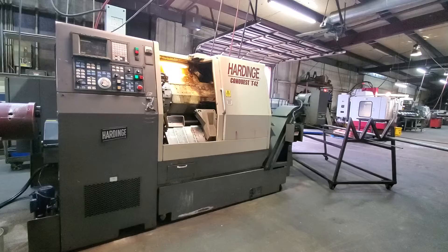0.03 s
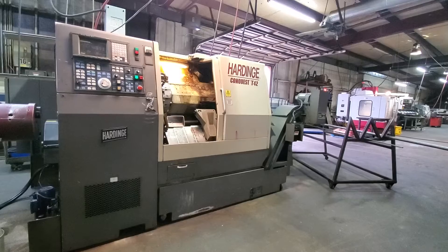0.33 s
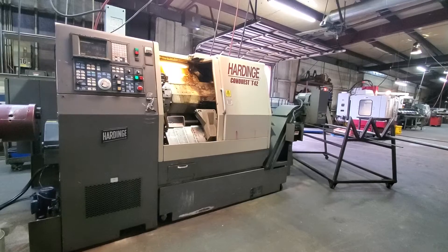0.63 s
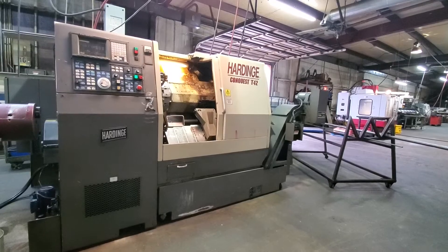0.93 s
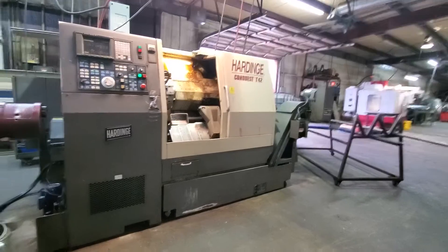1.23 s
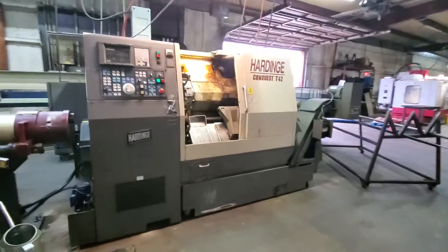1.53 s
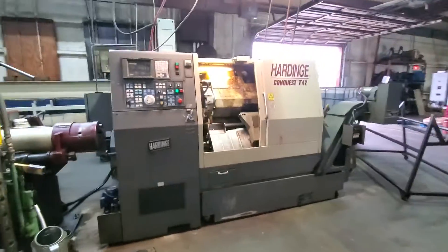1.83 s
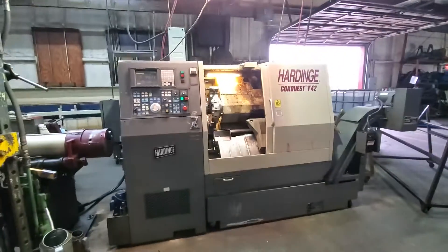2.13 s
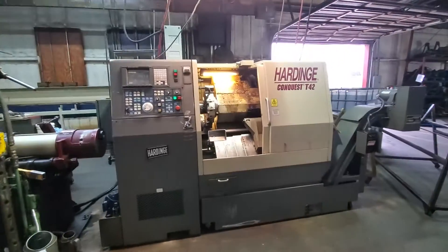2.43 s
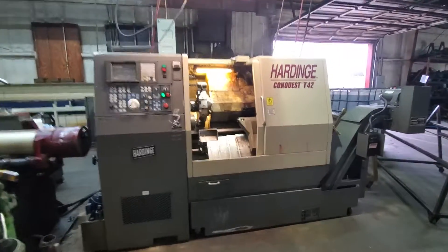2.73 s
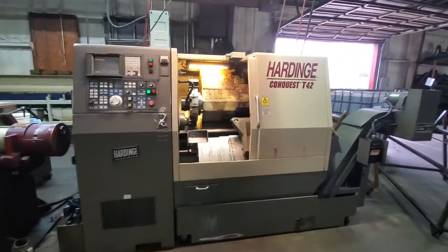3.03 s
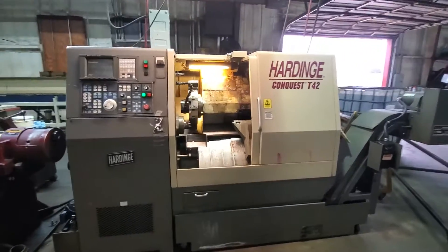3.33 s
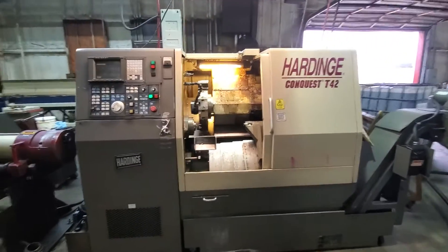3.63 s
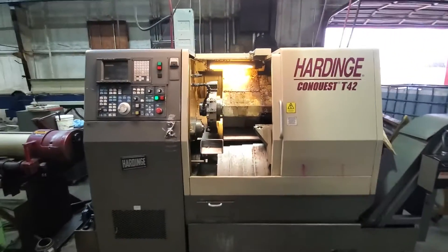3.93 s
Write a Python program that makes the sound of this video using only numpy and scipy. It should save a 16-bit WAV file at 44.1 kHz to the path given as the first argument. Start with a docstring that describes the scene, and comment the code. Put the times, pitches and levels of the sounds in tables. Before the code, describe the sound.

Compressed air hisses steadily over humming machines in a large workshop.

```python
"""Compressed air hisses from a leak on the left of a large workshop, beside an idling lathe.
The jet is broadband noise, rippled by wall reflections. The lathe hums, a pump and motors whine,
and fans rumble in the hall. The sound cuts in just after the start and swells at about one second;
the listener then turns towards the lathe, which changes the colour of the hiss at each ear."""
import sys
import numpy as np
from scipy import signal
from scipy.fft import rfft, irfft, next_fast_len
from scipy.io import wavfile
from scipy.ndimage import uniform_filter1d, map_coordinates

SR = 44100
rng = np.random.default_rng(int(sys.argv[2]) if len(sys.argv) > 2 else 0)


def wav_out(sig):
    """Save sig, one row per channel (or a flat mono array), as 16-bit PCM at SR to the path in sys.argv[1]."""
    wavfile.write(sys.argv[1], SR, np.round(np.clip(np.atleast_2d(sig).T, -1, 1) * 32767).astype(np.int16))


N = 176400
TIME_S = np.arange(N) / SR
BAND_LIMIT_HZ = 15790


def air_jet(spectrum, low_cut_hz=1150):
    """Noise of escaping air at one listening position, rms 1."""
    def response(hz):
        high_pass = hz ** 4 / (hz ** 4 + low_cut_hz ** 4)
        return amp(over_frequency(spectrum, hz)) * wall_ripple(hz) * high_pass * (hz < BAND_LIMIT_HZ)
    return unit_rms(filtered(hall_noise(patchy_db=1.48), response))


# Jet spectra before and after the turn. Each row: frequency in Hz, left and right in relative dB.
JET_BEFORE = [(1440, -31, -20), (1850, -18, -13.5), (2490, -20, -14), (2620, -23, -20.5), (3590, -15, -9.5),
              (4540, -17, -18.5), (6000, -13.5, -20), (7000, -11, -16.5), (7800, -11.5, -16),
              (8600, -9.3, -12.3), (10140, -4, -13.5), (12000, 0.5, -13.5), (12800, -4, -9.5),
              (14300, -5.5, -17), (15600, -7, -15)]
JET_AFTER = [(1470, -24.5, -20.5), (1870, -13.5, -12), (2800, -16.5, -16.5), (3880, -10, -7.5),
             (4600, -14.5, -13), (6000, -11.5, -13), (7100, -8, -22.5), (7580, -13, -13), (8930, -5, -10),
             (10150, -4, -11.5), (12000, -0.3, -7), (13000, 1, -9), (14570, -2.3, -8.5),
             (15700, -2.5, -9.5)]
# Top treble as the head swings. Each row: time in seconds, left gain in dB, right gain in dB.
LEAK_TOP_GAIN = [(1.3, 1, 1.5), (2.0, 1, -1.8), (2.24, 1, 2.5), (2.45, .7, -3), (3, 1, 0), (3.55, -.5, 1.2),
                 (4, -0.5, 1)]
# Lower part of the hiss. Each row: time in seconds, gain in dB.
LEAK_LOW_GAIN = [(.13, -.5), (1.0, 0), (1.5, -0.8), (2.0, -.5), (2.6, -0.5), (2.9, 0), (3.05, 1.9),
                 (3.2, 0), (3.6, -0.4), (3.85, -1), (4, -2.2)]
# Whole hiss. Each row: time in seconds, gain in dB.
LEAK_GAIN = [(.13, -23.5), (.82, -23.5), (1.25, -20), (2.1, -20), (3, -19.5), (4, -18.5)]

def air_leak(top_above_hz=13000, low_below_hz=6500):
    """The jet changes colour with the turn; its top treble is the most directional."""
    turn = turn_progress()
    jet = np.sqrt(1 - turn) * air_jet(JET_BEFORE) + np.sqrt(turn) * air_jet(JET_AFTER)
    top = filtered(jet, lambda hz: .5 + .5 * np.tanh((hz - top_above_hz) / 600))
    low = filtered(jet, lambda hz: 1 / (1 + (hz / low_below_hz) ** 8))
    jet += top * (amp(over_time(LEAK_TOP_GAIN)) - 1)
    jet += low * (amp(over_time(LEAK_LOW_GAIN)) - 1)
    return jet * amp(over_time(LEAK_GAIN))


# Hum as the lathe comes nearer. Each row: time in seconds, level in dB.
LATHE_LEVEL = [(.13, -52), (1, -63), (1.8, -52), (2.35, -58), (2.65, -47), (2.9, -52.5), (3.15, -46),
               (3.4, -48), (4, -48)]

def lathe_hum(pitch_hz=121.3):
    """Mains hum at constant pitch."""
    return hall_tone(pitch_hz, drift=np.zeros(N)) * amp(over_time(LATHE_LEVEL))


# Pump's standing waves. Each row: time in seconds, levels of harmonics 2, 3 and 4 in dB.
PUMP_LEVELS = [(.13, -60, -59.5, -63), (1.05, -62, -59, -63), (1.55, -52, -55.5, -62),
               (2.0, -54, -56.5, -58), (2.35, -55, -54, -52.5), (2.65, -51.5, -54, -56),
               (2.95, -51.5, -46.5, -54.5), (3.4, -58, -54, -58.5), (4, -56, -51, -57)]

def pump_whine(pulse_hz=261.9):
    """Harmonics of the pulse rate drift together; the listener moves through their standing waves."""
    drift = pitch_drift()
    return sum(hall_tone(order * pulse_hz, drift) * amp(level_db)
               for order, level_db in enumerate(over_time(PUMP_LEVELS), start=2))


# Motor whine. Each row: time in seconds, level in dB.
MOTOR_LEVEL = [(.13, -65), (1.45, -59), (1.7, -52), (2.0, -52), (2.25, -60), (4, -60)]

def motor_whine(pitch_hz=814.6):
    """One motor tone, loudest around the end of the turn."""
    return hall_tone(pitch_hz, pitch_drift()) * amp(over_time(MOTOR_LEVEL))


# Steady machines. Each row: frequency in Hz, level before the turn in dB, level after it in dB.
MACHINE_TONES = [(230.6, -58.5, -51), (394.2, -53, -59), (672, -69, -57.5), (845, -63, -63),
                 (1343, -72, -64), (1556, -65, -57), (1585, -66, -58), (2019, -67, -54), (3416, -52, -61)]

def machine_tones():
    """Running machines, each tone drifting on its own."""
    turn = turn_progress()
    return sum(hall_tone(hz, pitch_drift(2.987)) * amp(before_db + (after_db - before_db) * turn)
               for hz, before_db, after_db in MACHINE_TONES)


# Rumble spectrum. Each row: frequency in Hz, density in relative dB.
FAN_SPECTRUM = [(20, -32), (35, -14), (58, -1.5), (76, -1), (100, 1.5), (140, -2), (220, -2.5), (320, -7.5),
                (560, -3.5), (720, -10), (1000, -11), (1400, -9), (2500, -29)]
# Bass from place to place, then the whole rumble. Each row: time in seconds, gain in dB.
FAN_BASS_GAIN = [(.13, -1.5), (.7, 1.5), (1.05, -2), (1.3, -0.5), (1.6, -1), (2.3, -1), (2.7, -.5),
                 (3.25, 1.3), (4, -1.3)]
FAN_GAIN = [(.13, -44), (.8, -44.5), (1.3, -40.5), (2.1, -39), (2.8, -39), (3.2, -39.5), (4, -39.5)]

def fan_rumble(bass_below_hz=170, throb_db=1.2, throb_per_s=14):
    """Fans and distant machines, blurred by the hall; the bass throbs unevenly."""
    noise = hall_noise(patchy_db=0.83)
    rumble = unit_rms(filtered(noise, lambda hz: amp(over_frequency(FAN_SPECTRUM, hz))))
    bass = filtered(rumble, lambda hz: 1 / (1 + (hz / bass_below_hz) ** 4))
    bass_db = over_time(FAN_BASS_GAIN) + throb_db * wobble(throb_per_s)
    return (rumble + bass * (amp(bass_db) - 1)) * amp(over_time(FAN_GAIN))


# Hall's sound field. Each row: frequency in Hz, left-right correlation from -1 to 1.
HALL_CORRELATION = [(35, 1), (70, 0.85), (150, 1), (400, 0.75), (750, 0.59), (1000, 0.26), (1250, -0.39),
                    (1650, -0.25), (2050, 0.38), (2800, -0.077), (6000, 0.0081)]

def hall_spread(hz):
    """Mid and side gains for the hall's left-right correlation."""
    angle = np.arccos(np.clip(over_frequency(HALL_CORRELATION, hz)[0], -1, 1)) / 2
    return np.array([np.cos(angle), np.sin(angle)])


def hall_noise(patchy_db):
    """White stereo noise spread by the hall, with faint patches of random gain."""
    spectra = signal.stft(rng.standard_normal((2, N)), nperseg=1024)[2]
    patches = uniform_filter1d(rng.standard_normal(spectra.shape[1:]), size=5, axis=0)  # across frequency
    patches = uniform_filter1d(patches, size=14, axis=1)  # across time
    noise = signal.istft(spectra * amp(patchy_db * unit_rms(patches)), nperseg=1024)[1][:, :N]
    mid, side = filtered(noise, hall_spread)
    return np.array([mid + side, mid - side])


def hall_tone(hz, drift, echo_gain=.27):
    """A tone of rms 1; echoes make its level and phase waver at each ear."""
    phase = 2 * np.pi * hz * np.cumsum(1 + drift) / SR
    mid_gain, side_gain = hall_spread(hz)
    mid = mid_gain * (1 + echo_gain * (wobble(7.04) + 1j * wobble(6.95)))
    side = side_gain * (wobble(3.03) + 1j * wobble(3.23)) / np.sqrt(2)
    ears = np.array([mid + side, mid - side])
    return unit_rms((ears * np.exp(1j * phase)).real)


def wall_ripple(hz, depth_db=0.94, spacing_hz=69.7):
    """Spectral ripple from near reflections, different at each ear."""
    ripple = [map_coordinates(rng.standard_normal(512), [hz / spacing_hz], order=1, mode="mirror")
              for ear in range(2)]
    return amp(depth_db * np.array(ripple))


def turn_progress(start_s=1.07, end_s=1.91):
    """How far the listener has turned, 0 to 1."""
    return np.clip((TIME_S - start_s) / (end_s - start_s), 0, 1)


def pitch_drift(knots_per_s=2.92):
    """Slow wander, as a fraction of the pitch."""
    return 0.0012 * wobble(knots_per_s)


def wobble(knots_per_s):
    """Smooth random curve."""
    return map_coordinates(rng.standard_normal(256), [TIME_S * knots_per_s], mode="mirror")


def over_frequency(rows, hz):
    """Value columns interpolated on a log frequency axis."""
    knots_hz, *columns = np.transpose(rows)
    return np.array([np.interp(np.log(hz + 1), np.log(knots_hz + 1), column) for column in columns])


def over_time(rows):
    """Value columns interpolated per sample."""
    knots_s, *columns = np.transpose(rows)
    return np.array([np.interp(TIME_S, knots_s, column) for column in columns])


def filtered(x, response):
    """Zero-phase filter with gain response(hz)."""
    size = next_fast_len(N + SR // 4)
    return irfft(rfft(x, size) * response(np.fft.rfftfreq(size, 1 / SR)), size)[..., :N]


def amp(db):
    return 10 ** (np.asarray(db) / 20)


def unit_rms(x):
    return x / np.sqrt(np.mean(x ** 2) + 1e-20)


def scene():
    """The leak over the workshop's machines, in stereo."""
    return air_leak() + fan_rumble() + pump_whine() + machine_tones() + motor_whine() + lathe_hum()


def record(dry, start_s=.13, fade_s=0.0046):
    """Abrupt onset, then a steep low-pass."""
    onset = np.clip((TIME_S - start_s) / fade_s, 0, 1)
    return filtered(dry * onset, lambda hz: .5 - .5 * np.tanh((hz - BAND_LIMIT_HZ) / 70))


dry = scene()
out = record(dry)
wav_out(out)
```